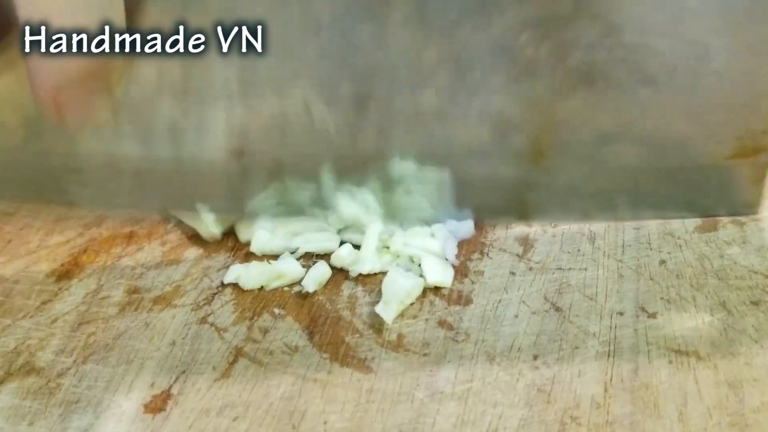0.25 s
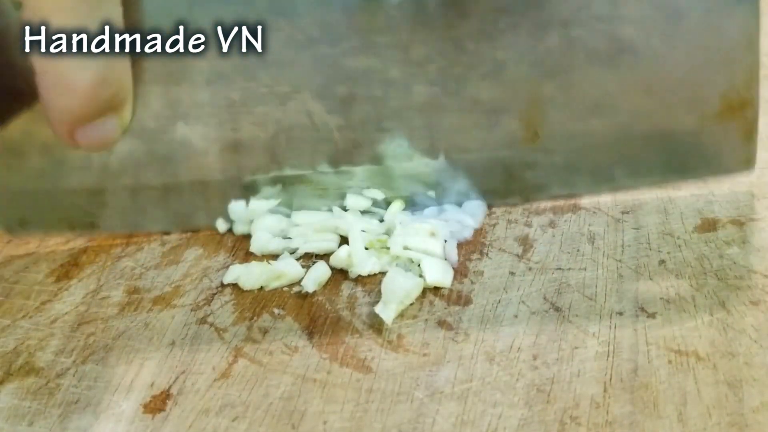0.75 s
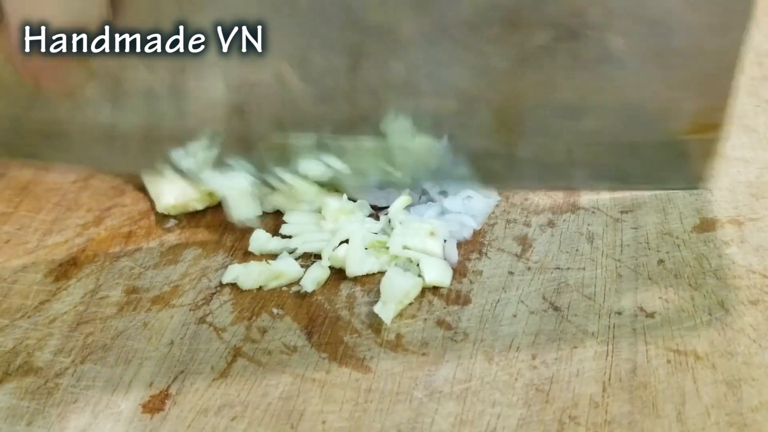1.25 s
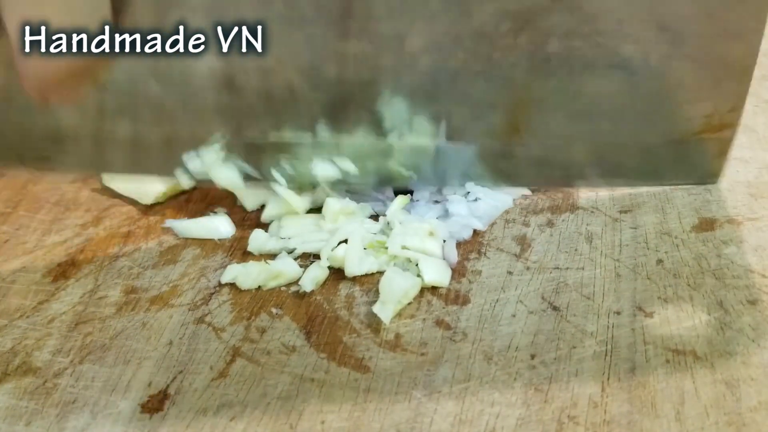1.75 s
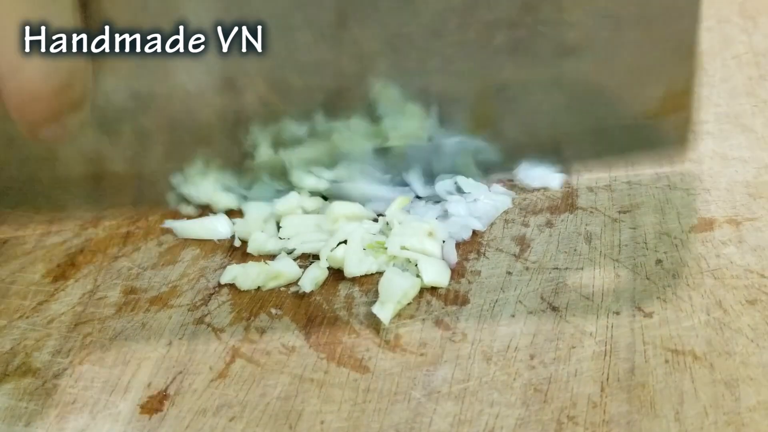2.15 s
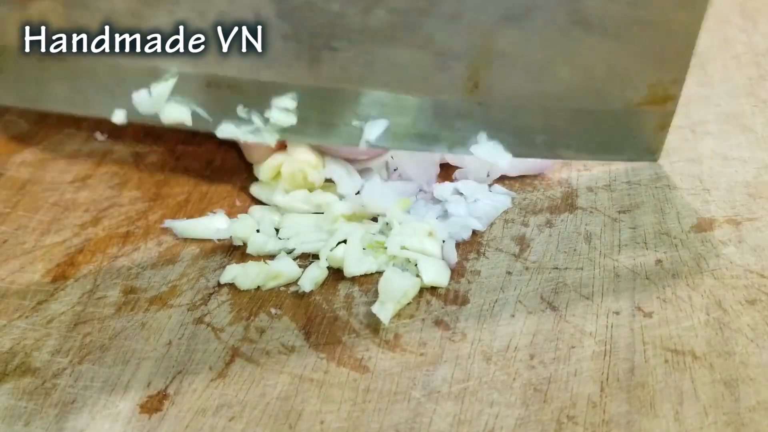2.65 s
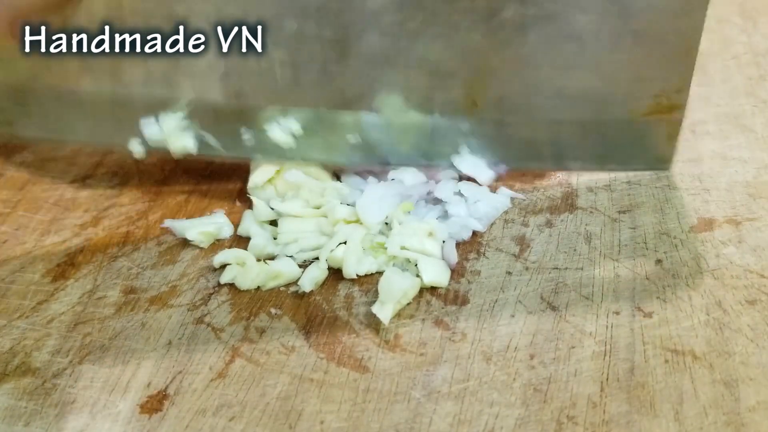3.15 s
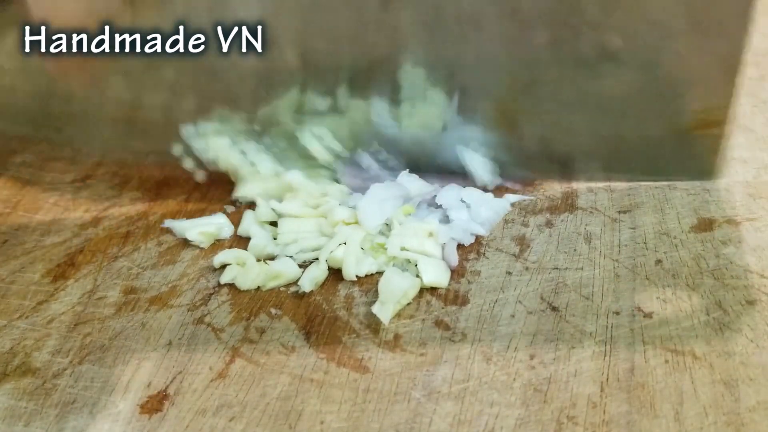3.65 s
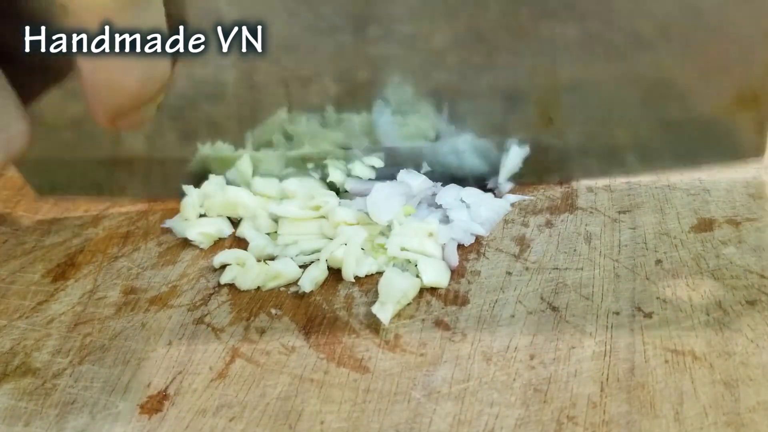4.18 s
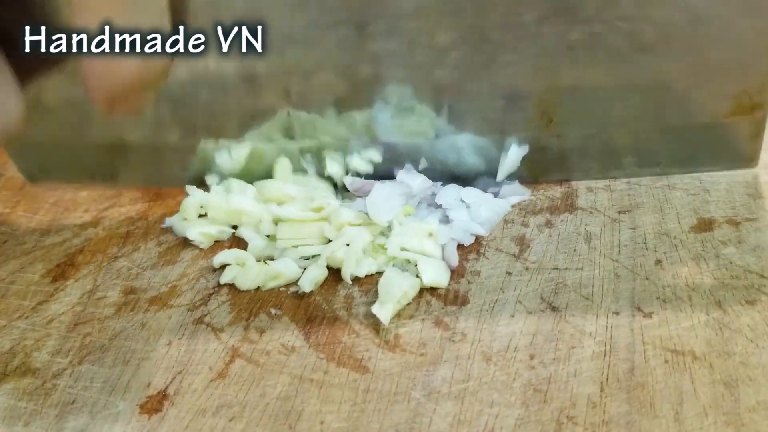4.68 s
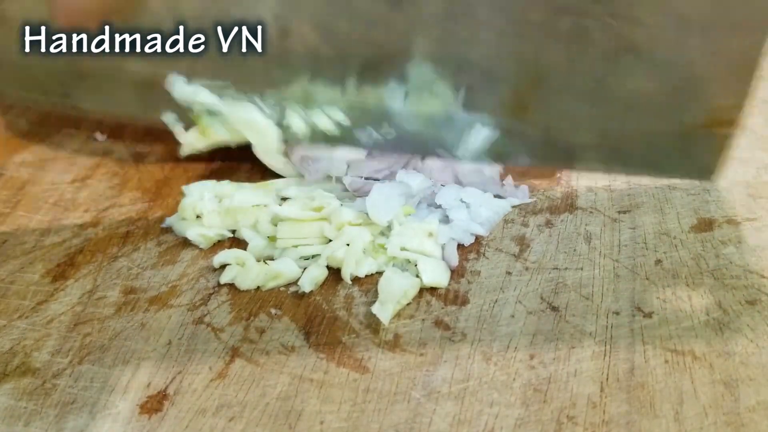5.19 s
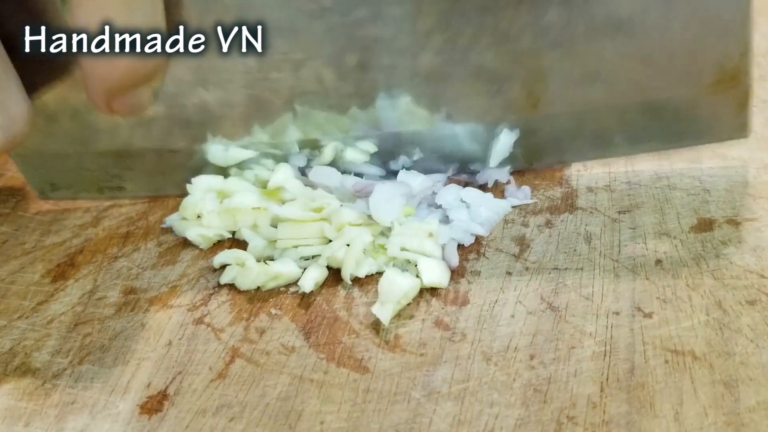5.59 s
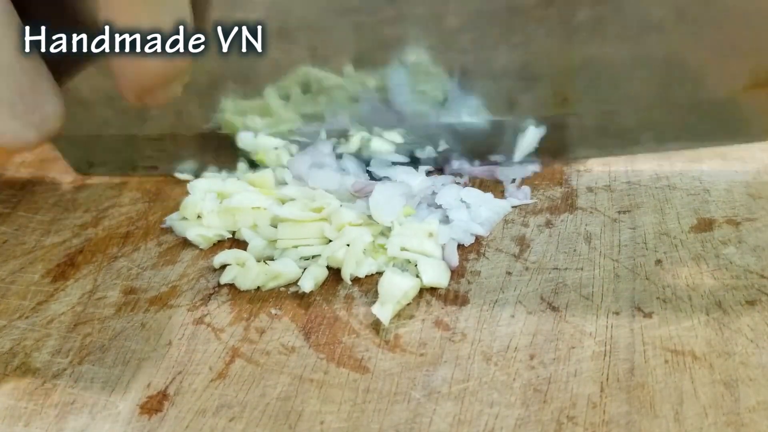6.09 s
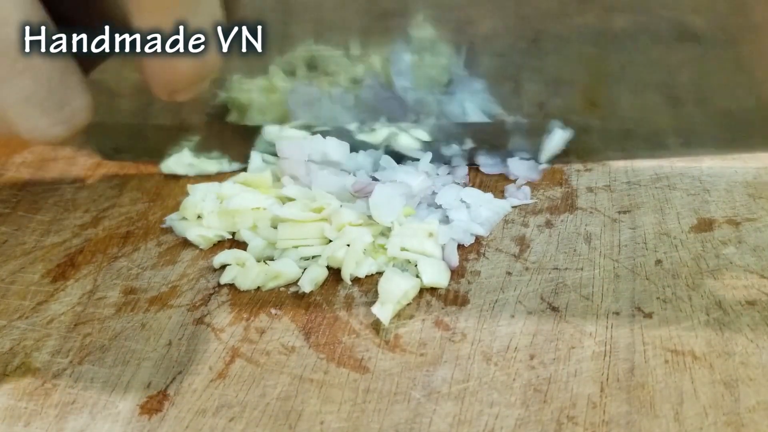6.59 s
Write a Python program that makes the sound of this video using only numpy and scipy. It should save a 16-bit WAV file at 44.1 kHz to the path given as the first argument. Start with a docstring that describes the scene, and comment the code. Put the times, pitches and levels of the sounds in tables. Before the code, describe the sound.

A heavy cleaver chops garlic on a thick wooden board, about four hard knocks a second with wet crunches and short scrapes in a small kitchen.

```python
"""In a small kitchen, a cleaver chops garlic on a thick wooden board, close to a pair of microphones.
About four strokes a second swish down, crunch through the cloves, knock on the wood and scrape.
Filtered noise makes swish and rumble, random clicks the crunch, decaying sines the board, blade and table.
The board rocks on its table, a hum wavers, the room answers, and the hardest knocks overload the recorder."""
import sys
import numpy as np
from scipy import signal
from scipy.io import wavfile
from scipy.ndimage import uniform_filter1d

SR = 44100
rng = np.random.default_rng(int(sys.argv[2]) if len(sys.argv) > 2 else 0)


def transcribe(signal):
    """Save signal, clipped to [-1, 1], as a 16-bit WAV file at the path in sys.argv[1]."""
    frames = np.atleast_2d(signal).T
    limited = np.clip(frames, -1, 1)
    pcm = np.round(limited * 32767).astype(np.int16)
    wavfile.write(sys.argv[1], SR, pcm)


N = 301203
REGRIP_S = 0.1  # a landing sooner than this is a second push: the blade neither scrapes nor swings between
SWING_LEAD_S = 0.067  # the swish peaks this long before the edge meets the garlic


def amp(db):
    """Decibels to linear gain."""
    return 10 ** (np.asarray(db) / 20)


def evened(x):
    """Scale to unit effective level."""
    return x / np.sqrt(np.mean(x ** 2) + 1e-20)


def curve(points, t):
    """Straight lines in time through (time [s], level [dB]) points."""
    return np.interp(t, *np.transpose(points))


def read(points, hz):
    """Straight lines over logarithmic frequency."""
    f, value = np.transpose(points)
    return np.interp(np.log(hz + 1), np.log(f + 1), value)


def add(mix, s, sound):
    """Lay a sound into the mix at s seconds, cut at the end."""
    part = mix[..., max(round(s * SR), 0):][..., :sound.shape[-1]]
    part += sound[..., :part.shape[-1]]


def highpass(x, hz, order=1):
    """Take away what lies below hz."""
    return signal.sosfilt(signal.butter(order, hz, "high", fs=SR, output="sos"), x)


def colour(x, spectrum):
    """Causal minimum-phase filter with the given spectrum and unit energy."""
    log_gain = np.log(amp(read(spectrum, abs(np.fft.fftfreq(4096, 1 / SR)))))
    minimum_phase = np.exp(np.conj(signal.hilbert(log_gain)))
    taps = np.fft.ifft(minimum_phase).real[:2048]
    return signal.oaconvolve(x, taps[None] / np.linalg.norm(taps), axes=1)[:, :N]


def ring(modes, scatter=0, detune=0):
    """Decaying modes of alternating sign; place of the blow and press of the blade vary share and pitch."""
    t = np.arange(SR // 4) / SR
    hz, db, t60 = np.transpose(modes)[:, :, None]
    sign = (-1) ** np.arange(len(modes))[:, None]
    share = sign * amp(db + scatter * rng.standard_normal(db.shape))
    hz = hz * (1 + detune * rng.standard_normal(hz.shape))
    decay = np.exp(-np.log(1000) * t / t60)
    return np.sum(share * decay * np.sin(2 * np.pi * hz * t), axis=0)


def resonate(force, modes):
    """A force on both sides excites a ring of unit energy."""
    return signal.oaconvolve(force, modes[None] / np.linalg.norm(modes), axes=1)[:, :N]


def blow(ms):
    """A force pulse of unit area: the longer the contact, the duller."""
    u = np.arange(400) / SR * 6000 / ms  # the pulse peaks at a sixth of the contact time
    pulse = u * np.exp(-u)
    return pulse / np.sum(pulse)


def grains(per_s, spread_db, shared, left_lag_s=0.00045):
    """Tiny ruptures of uneven size; those shared by both microphones reach the left one later."""
    size = amp(spread_db * np.minimum(rng.exponential(1, (3, N)), 4))
    sign = rng.choice([-1, 1], (3, N))
    clicks = evened(size * sign * (rng.random((3, N)) < per_s / SR))
    both = np.array([np.roll(clicks[2], round(left_lag_s * SR)), clicks[2]])
    return np.sqrt(shared) * both + np.sqrt(1 - shared) * clicks[:2]


def narrow(x, hz):
    """Below hz both microphones hear nearly the same."""
    side = highpass((x[0] - x[1]) / 2, hz)
    return x.mean(0) + np.array([side, -side])


def echoes(x, t60s, delay):
    """Dense reflections, other ones for each side, each band dying at its own speed."""
    hz, t, z = signal.stft(rng.standard_normal((2, SR // 2)), SR, nperseg=256)
    decay = 1e-3 ** (t / read(t60s, hz)[:, None])
    tail = signal.istft(z * decay, SR, nperseg=256)[1]
    tail = np.pad(tail / np.linalg.norm(tail[0]), ((0, 0), (round(delay * SR), 0)))
    return narrow(signal.fftconvolve(x, tail, axes=1)[:, :N], 950)


# How long the small kitchen rings: (frequency [Hz], time to fall 60 dB [s])
KITCHEN_DECAY = [(60, 0.2), (350, 0.56), (1000, 0.63), (4000, 0.52), (15000, 0.27)]


def kitchen(x, delay):
    """The room answers after a delay with a dense tail."""
    return echoes(x, KITCHEN_DECAY, delay)


# First reflections off blade and worktop: (delay [s], left gain [linear], right gain [linear])
FIRST_REFLECTIONS = [(.0029, 0.041, -0.067), (0.0117, -0.11, 0.045), (.0256, -0.14, -0.03)]


def reflect(wood):
    """Blade and worktop return single delayed copies to each microphone."""
    out = np.zeros((2, N))
    for delay, left, right in FIRST_REFLECTIONS:
        add(out, delay, wood * [[left], [right]])
    return out


# Tones of the low hum: (frequency [Hz], relative level [dB])
HUM_TONES = [(128, -1.5), (149, -5)]
# Swell of the hum: (time [s], relative level [dB])
HUM_SWELL = [(0, -62), (1.2, -34.5), (1.6, -35.5), (2.2, -34.5), (2.6, -49), (3.4, -38.5), (4.2, -67),
             (6.83, -67)]


def hum(waver=0.13):
    """Low sine tones swell and recede while their phase and level waver together."""
    t = np.arange(N) / SR
    knots = np.arange(0, 7, 0.12)
    drift = waver * np.interp(t, knots, rng.standard_normal(len(knots)))
    tones = sum(amp(db) * np.sin(2 * np.pi * hz * t + 2 * drift) for hz, db in HUM_TONES)
    return tones * (1 + drift / 2) * amp(curve(HUM_SWELL, t) - 2.5)


# Spectrum of the kitchen rumble: (frequency [Hz], relative density [dB per Hz])
RUMBLE_SPECTRUM = [(20, -17), (50, 2), (90, 10), (135, -0.5), (200, -4.5), (350, -3.5), (600, -19.5),
                   (1200, -21.5), (4000, -38.5), (16000, -44)]
# Course of the kitchen rumble: (time [s], relative level [dB])
RUMBLE_LEVEL = [(0, -27), (.4, -31), (1.6, -35), (2.1, -37.5), (2.7, -35.5), (4.15, -33.5), (4.9, -44),
                (5.4, -37), (6.7, -39), (6.83, -48)]


def rumble():
    """Low kitchen rumble: coloured noise that rises and falls and ends softer than it began."""
    noise = narrow(rng.standard_normal((2, N)), 280)
    level_db = curve(RUMBLE_LEVEL, np.arange(N) / SR)
    return amp(level_db - 2) * colour(noise, RUMBLE_SPECTRUM)


# Modes of the heavy table: (frequency [Hz], relative level [dB], time to fall 60 dB [s])
TABLE_MODES = [(47.9, 4, 0.1), (71.4, -2.5, 0.12), (91, 4.5, 0.11), (124.6, 4.5, 0.034),
               (188.4, 6.5, 0.068)]
# One row per stroke of the cleaver: (landing time [s], knock level [dB], contact [ms],
# time in the garlic [s], crunch on entry [dB], crunch on landing [dB], fizz of juice over the crunch [dB],
# time from landing until the scrape [s], scrape [dB]); levels are relative
CHOPS = [(0.105, -3.5, 0.72, 0.0013, -18, -19, -5, 0.0088, -21),
         (0.3168, -10, 0.32, 0.00095, -41, -20, -23, 0.06, -33),
         (.332, -11, .4, 0.0055, -25, -29.5, -10, 0.056, -35.5),
         (.557, -1, 0.42, 0.013, -13.5, -15.5, -25, 0.042, -33.5),
         (.779, 3, 0.48, 0.02, -13.5, -21.5, -22, .04, -37.5),
         (0.987, 2, 0.89, 0.015, -17, -18, -6, 0.06, -50),
         (1.198, -10, 1.06, 0.022, -34, -22, -9, 0.059, -45.5),
         (1.433, 0, 1.05, 0.027, -28.5, -20, -1, .052, -38),
         (1.666, -6.5, 0.24, 0.019, -28, -23.5, -9, 0.057, -39),
         (2.2205, -3.5, 0.39, 0.08, -48.5, -17, -4, .06, -29),
         (2.492, 0, 0.8, 0.037, -32.5, -22.5, -4, 0.046, -28),
         (2.759, -6, .21, 0.053, -35.5, -29.5, -8, .04, -50),
         (2.772, -15, 0.23, 0.022, -28, -17.5, 1.5, 0.043, -46),
         (3.012, -7.5, 0.28, .011, -21.5, -20.5, -4, 0.057, -37),
         (3.254, -11.5, 0.099, 0.022, -34, -20.5, -3.5, 0.048, -34),
         (3.498, -8, 0.39, 0.028, -32.5, -21.5, -2, .05, -30),
         (3.6921, 4, 0.63, 0.0019, -36, -37, 19, .03, -50),
         (3.728, 1.5, 1.5, 0.014, -16.5, -12, 1.5, 0.035, -43),
         (3.954, -8, 0.37, 0.018, -28.5, -18, -12, .058, -36),
         (4.198, 7.5, 0.76, 0.033, -28.5, -20, -4, 0.036, -36),
         (4.217, 0, 0.46, 0.0046, -32, -29.5, 4, 0.033, -37),
         (4.427, -10, 0.65, 0.0051, -29, -33.5, 4, 0.017, -32.5),
         (4.6802, -5.5, 1.1, 0.024, -31.5, -29, 1.5, 0.054, -45.5),
         (4.9, -7, 1.56, 0.013, -34.5, -28.5, 0, 0.057, -44),
         (5.133, -24, 0.34, 0.047, -41.5, -34, 8, 0.041, -42.5),
         (5.359, 3.5, 0.58, 0.044, -29, -24.5, 1.5, 0.048, -33),
         (5.604, -15.5, 0.19, .022, -29.5, -28, 2, 0.053, -38.5),
         (5.846, -14, 0.13, 0.012, -29.5, -35, .5, 0.028, -50),
         (5.864, -18.5, 0.22, 0.0092, -24.5, -26.5, 3, 0.056, -45),
         (6.1174, 1.5, 0.81, 0.034, -21.5, -23.5, -2.5, 0.042, -30),
         (6.352, -16.5, 0.37, 0.026, -22.5, -23, -0.5, 0.041, -33),
         (6.572, -12.5, 0.1, 0.024, -20.5, -20, -1, .108, -39.5)]


def table(rise_s=0.02, push_db=-22.5, push_share=0.98):
    """The heavy table takes up each blow slowly and answers with a low thud."""
    out, t = np.zeros(N), np.arange(SR // 4) / SR
    rise = 1 - np.exp(-t / rise_s)
    for s, db, *_ in CHOPS:
        level = amp(push_db + push_share * db)  # dB of thud per dB of knock
        add(out, s, level * ring(TABLE_MODES, scatter=0.33) * rise)
    return np.array([out, out])


# Modes of the board with table and blade: (frequency [Hz], relative level [dB], time to fall 60 dB [s])
BOARD_MODES = [(346.6, -5, 0.17), (491, 3.5, 0.029), (500.7, 3.5, 0.028), (560.5, -6, 0.063),
               (659, -8.5, 0.045), (820, -71, 0.14), (935.3, -6.5, 0.038), (1261, -18.5, 0.063),
               (1470, -25.5, 0.027), (1756, -23, 0.11), (2040, -19.5, 0.1), (2490, -30, 0.048),
               (2530, -40, 0.041), (2860, -35, 0.066)]


def board(scatter=0, detune=0):
    """The thick wooden board rings in decaying modes."""
    return ring(BOARD_MODES, scatter, detune)


def radiate(x):
    """The board is too small to send out deep bass; it lies a little to the left."""
    return highpass(x, 230, order=2) * amp([[1.1], [-1.1]])


# Vigour of the swing: (time [s], relative level of the swish [dB])
SWING_VIGOUR = [(0, -39.5), (.25, -45.5), (.6, -44), (.9, -47), (1.35, -41.5), (1.6, -44), (2.1, -69),
                (2.38, -45), (3.35, -45.5), (3.65, -41), (4.8, -52.5), (5.3, -48), (6.5, -53.5)]


def swings():
    """For every stroke that comes down through the air: when it meets the garlic, and its vigour."""
    landing, _, _, length, *_ = np.transpose(CHOPS)
    entry = (landing - length)[np.diff(landing, prepend=-1) > REGRIP_S]
    return zip(entry, curve(SWING_VIGOUR, entry - SWING_LEAD_S))


# Spectrum of the hollow swish: (frequency [Hz], relative density [dB per Hz])
SWISH_SPECTRUM = [(30, -59.5), (200, -3.5), (295, -15), (350, 13), (420, 7), (600, 0), (1100, -21),
                  (2300, -18.5), (4300, -19), (5700, -29.5), (7200, -16), (8200, -16.5), (9200, -28),
                  (12500, -17.5), (16000, -23)]


def swish(half_s=0.031, shift_db=2):
    """Grainy noise swells with each swing of the arm, and the shifting board murmurs along."""
    t = np.arange(N) / SR
    moves = [(s - SWING_LEAD_S, db, half_s) for s, db in swings()]
    moves.append((1.92, -53, 0.1))  # one slow lift to gather the cloves
    power = np.zeros(N)
    for s, db, half in moves:
        power += amp(db) ** 2 * np.exp(-np.minimum(((t - s) / half) ** 2, 40))
    swell = np.sqrt(power)
    rub = swell * grains(9000, 3.5, 0)
    hollow = echoes(rub, [(300, 0.011), (8000, 0.028)], 0)
    hiss = colour(narrow(rub, 1000) + amp(-5.5) * hollow, SWISH_SPECTRUM)
    modes = board()
    shifting = swell * rng.standard_normal(N)
    murmur = signal.oaconvolve(shifting, modes / np.linalg.norm(modes))[:N]
    return amp(16) * hiss * amp([[1.5], [-1.5]]) + amp(shift_db) * radiate(murmur)


# Further jolts of the board, hard and soft: (time [s], relative level [dB])
BOARD_JOLTS = [(.001, -0.5), (.485, -8.5), (1.344, -15), (1.884, -21.5), (1.92, -22.5), (1.98, -27),
               (2.029, -25), (2.176, -10), (2.187, -10), (2.455, -10), (2.721, -8.5), (2.931, -15.5),
               (3.221, -14), (3.463, -13), (3.641, -9), (4.573, -17.5), (6.026, -16)]


def bumps(rattle=0.023, rattle_s=0.036, rock_lead_s=0.07, rock_db=24.5):
    """Soft blows with a short rattle: the board rocks with every swing and now and then jolts."""
    out, t = np.zeros(N), np.arange(SR // 6) / SR
    rocking = [(s - rock_lead_s, db + rock_db) for s, db in swings()]
    for s, db in BOARD_JOLTS + rocking:
        force = rattle * rng.standard_normal(len(t)) * np.exp(-t / rattle_s)
        force[0] = 1  # the bump itself
        add(out, s, amp(db) * force)
    soft_blow = np.convolve(board(), blow(1.08))
    return radiate(signal.oaconvolve(out, soft_blow)[:N])


# Modes of the blade: (frequency [Hz], relative level [dB], time to fall 60 dB [s])
BLADE_MODES = [(2476, -2, 0.12), (2708, 4, 0.05), (3024, -19, 0.15), (3295, -9.5, 0.06), (4122, 3, 0.027),
               (4296, 7.5, 0.043), (5070, -9.5, 0.047)]


def steel(force):
    """The blade's own ring."""
    return resonate(force, ring(BLADE_MODES))


# Spectrum of crunch and scrape: (frequency [Hz], relative density [dB per Hz])
CRUNCH_SPECTRUM = [(59, -45), (100, -2), (196, -15.5), (378, 5), (936, -7), (1460, -16), (2270, -16),
                   (2470, -12.5), (2870, -17), (4280, -15), (5630, -21.5), (7100, -17.5), (8770, -23),
                   (12000, -20.5), (15500, -21.5)]


def crunch(force):
    """Small ruptures take on the colour of the crunch."""
    return colour(force, CRUNCH_SPECTRUM)


def scraping_strokes():
    """The strokes that no second push follows."""
    following = CHOPS[1:] + [[np.inf]]
    return [row for row, after in zip(CHOPS, following) if after[0] - row[0] > REGRIP_S]


# Singing of the rubbed edge: (frequency [Hz], relative level [dB], time to fall 60 dB [s])
EDGE_MODES = [(4120, 0, .08), (2080, -12, .05)]


def scrapes(rub_s=0.0075, sing_db=-10):
    """After landing the blade rubs past wood and wet pieces, and its edge sings briefly."""
    t, rub = np.arange(N) / SR, np.zeros(N)
    for s, *_, wait_s, db in scraping_strokes():
        rub += amp(db) * np.exp(-abs((t - s - wait_s) / rub_s))
    force = rub * grains(6000, 7.2, 0.17)
    sing = resonate(force, ring(EDGE_MODES))
    return amp(10) * crunch(narrow(force, 900)) + amp(-9.5) * steel(force) + amp(sing_db) * sing


def crisp(x):
    """A snap is too brief to push much bass into the board."""
    return highpass(x, 700)


# Firm pieces that snap: (time [s], relative level [dB])
FIRM_SNAPS = [(0.1009, -5), (0.3172, -11.5), (0.5401, 0.5), (0.5494, -5.5), (.757, -11.5), (.981, -1),
              (0.9845, -6.5), (1.429, -3.5), (2.2189, 0), (2.489, -5), (2.758, -0.5), (3.685, -13),
              (3.711, 1.5), (3.723, -7), (3.951, -13), (4.186, -6), (4.426, -14), (5.129, -13.5),
              (5.845, -11), (6.078, -12), (6.321, -12), (6.542, -11), (6.5701, -0.5)]
# Spectrum of the fizzing juice: (frequency [Hz], relative density [dB per Hz])
JUICE_SPECTRUM = [(30, -42), (3000, -5.5), (5500, -1.5), (7200, 0), (9000, -5.5), (12500, 0.5), (16000, -5)]


def garlic(lead_s=0.006, follow_s=0.0017, trail_s=0.0071, snap_s=0.0017, clump_db=1.5):
    """Cells burst under the edge in clumps; the crackle sounds through board and blade, and juice fizzes."""
    t = np.arange(N) / SR
    pressure, juice, snaps = np.zeros((3, N))
    for s, _, _, length, entry_db, landing_db, fizz_db, *_ in CHOPS:
        near = abs(t - s) < 0.15
        u = t[near] - s
        before = np.minimum(u + length, 0) / lead_s
        after = np.maximum(u - follow_s, 0) / trail_s  # the edge still crushes for follow_s
        level_db = np.interp(u, [-length, 0], [entry_db, landing_db])
        stroke = amp(level_db) * np.exp(before - after)
        pressure[near] += stroke
        juice[near] += stroke * amp(fizz_db)
    for s, db in FIRM_SNAPS:
        add(snaps, s, amp(db) * np.exp(-t[:SR // 50] / snap_s))
    clumps = amp(clump_db * evened(uniform_filter1d(rng.standard_normal(N), size=130)))
    bursts = pressure * clumps * grains(2800, 4.43, 0.053)
    force = amp(3) * bursts + amp(2) * crisp(snaps * grains(25000, 2.1, 0.4))
    fizz = colour(juice * clumps * grains(6600, 2.2, 0.061), JUICE_SPECTRUM)
    return crunch(narrow(force, 1230)) + amp(-13.5) * steel(force) + amp(-1) * fizz


# Spectrum of cracking wood fibres: (frequency [Hz], relative density [dB per Hz])
FIBRE_SPECTRUM = [(30, -60), (250, 3), (550, 1), (900, -2.5), (1100, -5), (1400, -13.5), (2200, -15.5),
                  (5000, -42.5), (16000, -31)]


def knocks(thock_hz=520, thock_s=0.0013, crack_s=0.013):
    """Each landing dents the wood with a brief thock, cracks its fibres and rings the board."""
    out, crack, t = np.zeros(N), np.zeros(N), np.arange(SR // 4) / SR
    thock = amp(2.5) * np.exp(-t / thock_s) * np.sin(2 * np.pi * thock_hz * t)
    for s, db, ms, *_ in CHOPS:
        modes = board(scatter=1.5, detune=0.02)
        add(out, s, amp(db - 2.5) * np.convolve(modes - thock, blow(ms)))
        add(crack, s, amp(db) * np.exp(-t / crack_s))
    fibres = narrow(crack * rng.standard_normal((2, N)), 400)
    return radiate(out + amp(-15.5) * colour(fibres, FIBRE_SPECTRUM))


def shade(x, hz=6000, loss=0.57):
    """The right microphone faces away and loses some treble."""
    return np.array([x[0], x[1] - loss * highpass(x[1], hz)])


def scene():
    """Chopping close by, its near reflections and the kitchen around it, as the two microphones hear it."""
    wood, thud = knocks() + bumps(), table()
    crackle = (garlic() + scrapes()) * amp([[1.5], [-0.5]])  # a little to the left
    near = amp(-12.5) * echoes(crackle, [(300, 0.11), (12000, 0.068)], 0.001225)
    near += amp(-13) * echoes(wood, [(100, 0.07), (3000, 0.07)], 0.003)
    near += reflect(wood)
    room = amp(-14.5) * kitchen(wood, 0.016)
    room += amp(-16.5) * kitchen(crackle, 0.012)
    room += amp(2.5) * kitchen(thud, 0.009)
    return shade(wood + thud + crackle + near + room + swish() + rumble() + hum())


def record(dry, edge_hz=15850):
    """The recorder clips the hardest knocks; then a low-pass limits the band."""
    clipped = np.clip(dry, -1, 1)
    lowpass = signal.firwin(511, edge_hz, window=("kaiser", 9), fs=SR)
    return signal.oaconvolve(clipped, lowpass[None], "same")


dry = scene()
out = record(dry)
transcribe(out)
```